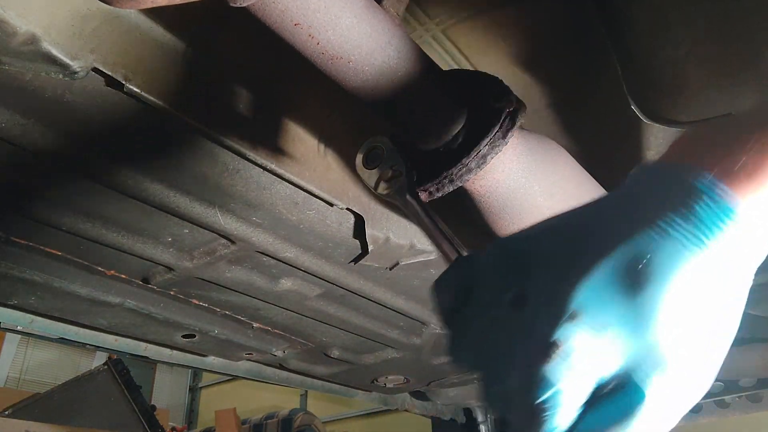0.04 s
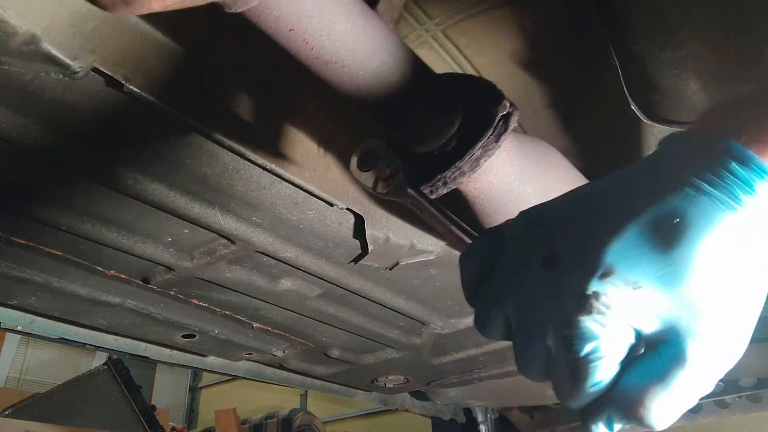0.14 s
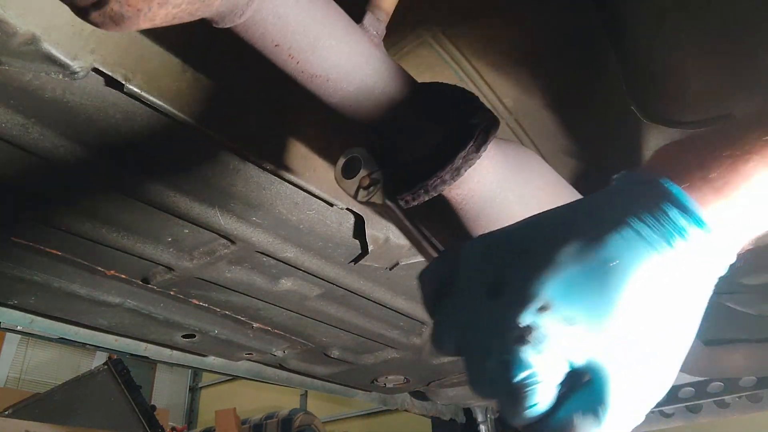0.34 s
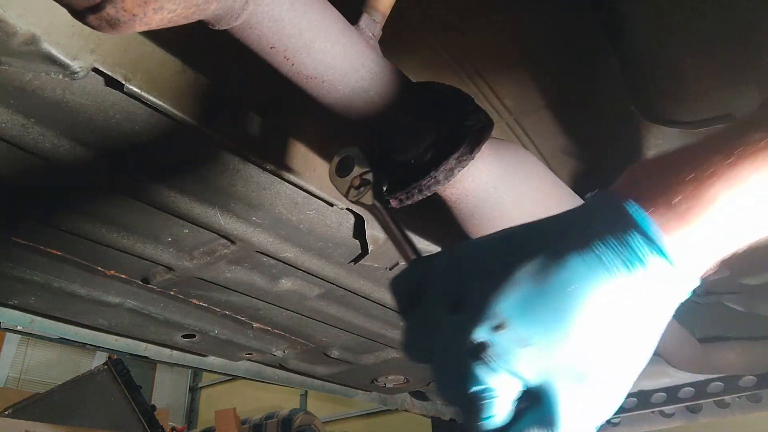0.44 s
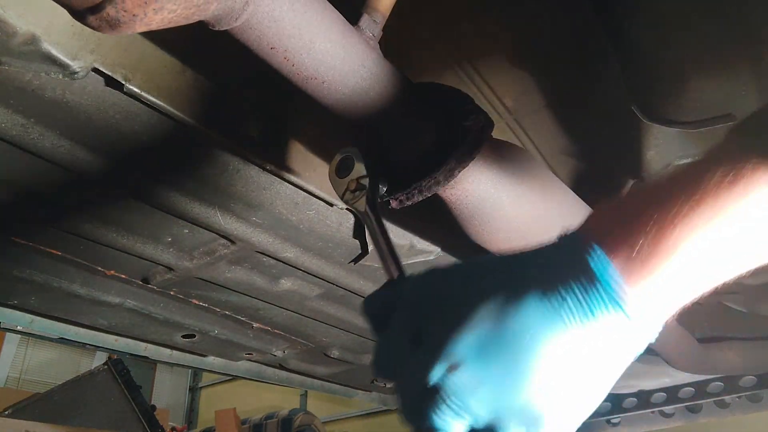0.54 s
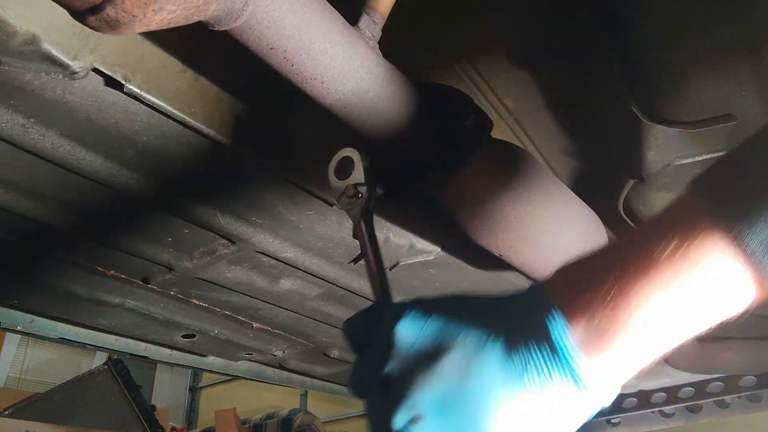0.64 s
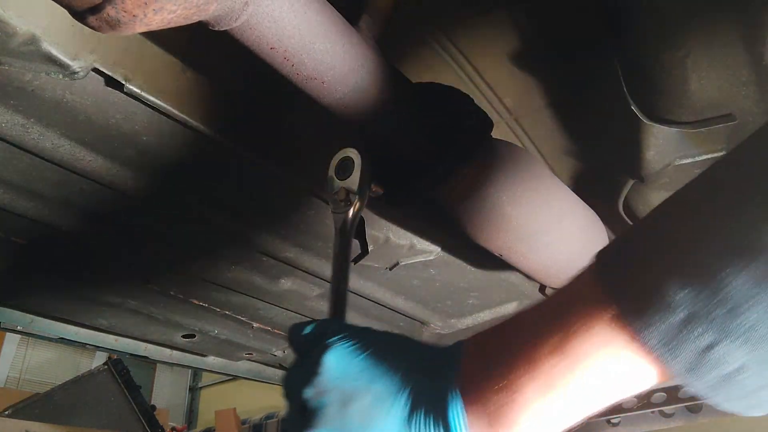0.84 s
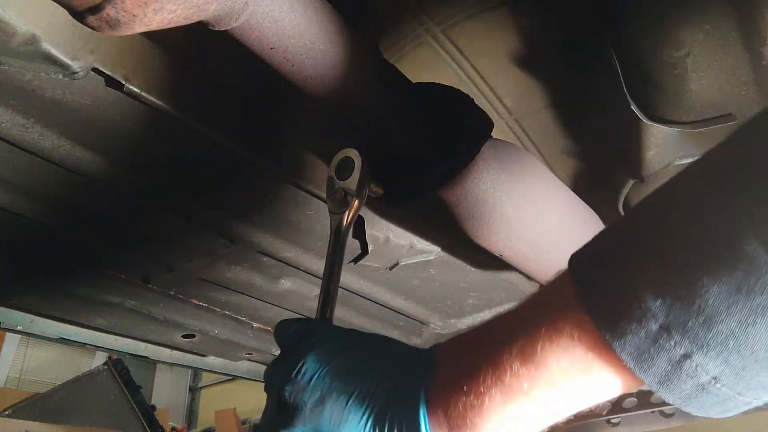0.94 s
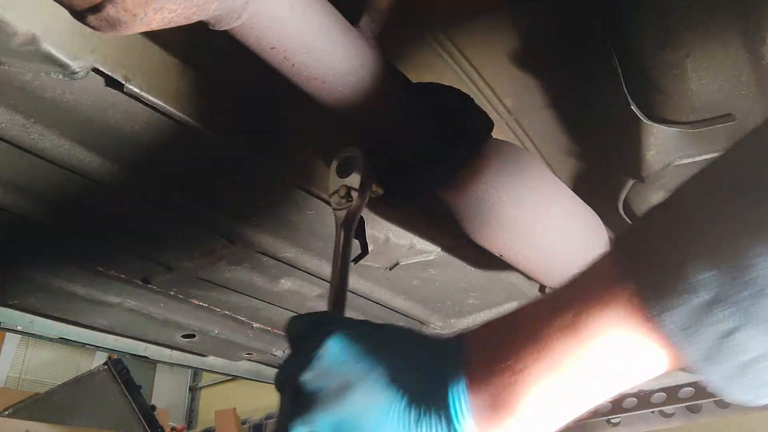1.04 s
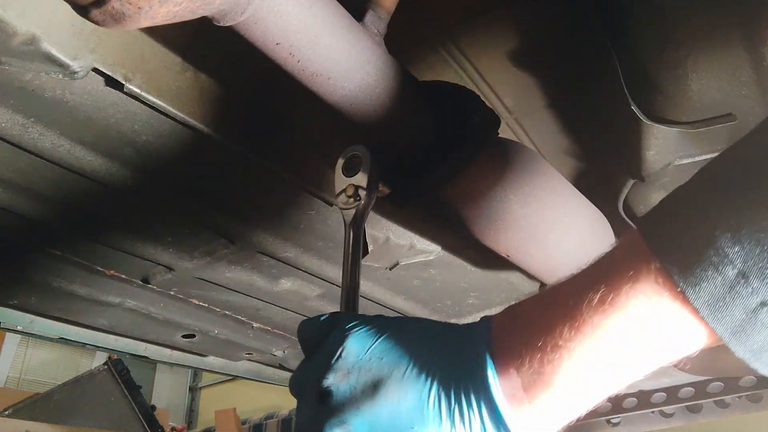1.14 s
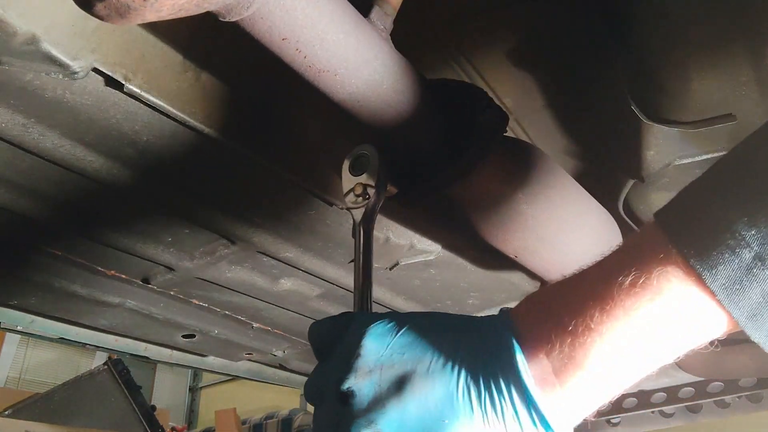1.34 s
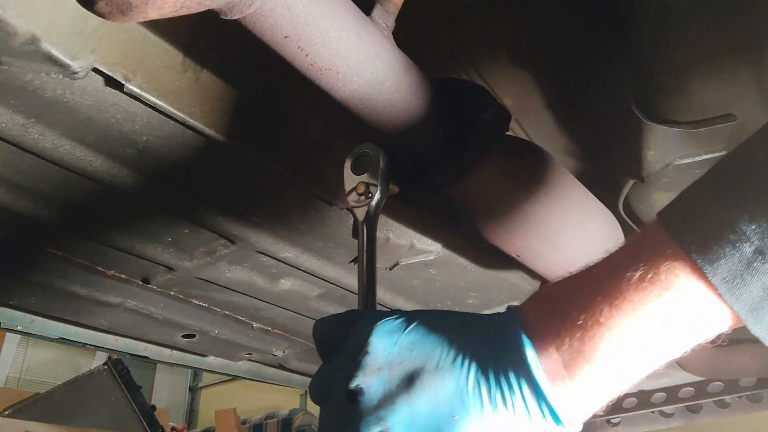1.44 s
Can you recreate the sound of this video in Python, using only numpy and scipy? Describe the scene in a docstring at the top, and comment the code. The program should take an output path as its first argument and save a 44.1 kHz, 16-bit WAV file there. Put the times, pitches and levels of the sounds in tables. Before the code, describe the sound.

Ratchet wrench clicking fast, eight bright metallic clicks after a rusty bolt rasps under strain

```python
"""A rusty exhaust bolt rasps under a car as a gloved hand strains a ratchet, and dull bumps hit the camera.
Then the handle swings back and the pawl clicks over eight teeth, ringing the tool and the pipe.
Rasps are dense random slips, clicks are short noise bursts with ringing steel, bumps are short low waves.
A low garage hum and hiss lie under all; two spaced microphones hear the work from the left."""
import sys
import numpy as np
from scipy import signal
from scipy.fft import rfft, irfft
from scipy.io import wavfile
from scipy.ndimage import uniform_filter1d

SR = 44100
rng = np.random.default_rng(int(sys.argv[2]) if len(sys.argv) > 2 else 0)


def how_loud(loudness_db):
    """Turn decibels into a plain amplitude multiplier (0 dB gives 1, 20 dB gives 10)."""
    steps = np.asarray(loudness_db, float) / 20
    return 10 ** steps


def unload_audio(sound):
    """Save the sound as a 16-bit wav file, at the path given as the first command line argument."""
    columns = np.transpose(np.atleast_2d(sound))
    # keep every value between -1 and 1, then stretch to whole-number steps
    steps = np.round(np.clip(columns, -1, 1) * 32767)
    wavfile.write(sys.argv[1], SR, steps.astype(np.int16))


N = 66150  # length in samples
RISE_S = 0.003  # time a click takes to build up, in seconds

# Notes of the ringing pipe (low) and tool (high).
# Each row: pitch in Hz, relative level in dB, time to fade by 60 dB in seconds.
STEEL = [(404, -40, .1), (692, -33, .12), (790, -30, .13), (900, -31, .2), (1600, -38, .1),
         (1760, -38, .12), (1873, -40, .12), (2335, -38, .15), (2600, -36, .07), (2978, -40, .28),
         (3155, -37, .1), (3405, -31, .1), (3452, -30, .1), (3545, -33, .08), (4068, -34, .08),
         (4858, -35, .3), (5600, -35, .08), (5188, -35, .12), (7890, -34, .05), (8130, -33, .06),
         (8258, -32, .08), (8400, -34, .06)]
# How much later the right microphone hears the work. Each row: frequency in Hz, delay in seconds.
LAG = [(400, 0.00037), (800, 0.00032), (1300, 0.00045), (10000, 0.000456)]
# How alike the two microphones hear the work. Each row: frequency in Hz, shared part from 0 to 1.
DIRECT = [(300, 0.95), (1000, 0.73), (3000, 0.24), (10000, 0.2)]


def evened(x):
    """Scales a signal to an average (rms) level of one."""
    return x / np.sqrt(np.mean(x ** 2) + 1e-20)


def read(points, hz):
    """Reads a curve between its points, along a logarithmic frequency scale."""
    f, value = np.transpose(points)
    return np.interp(np.log(hz + 1), np.log(f + 1), value)


def add(mix, s, sound):
    """Adds a sound to the mix from s seconds on, cut off at the end of the mix."""
    part = mix[:, max(round(s * SR), 0):][:, :sound.shape[1]]
    part += sound[:, :part.shape[1]]


def pair(a, b, same, lag=((1, 0), (2, 0)), db=((1, 0), (2, 0)), lean=((1, 0), (2, 0))):
    """Two channels from a shared and an unshared signal, coloured, the right one delayed."""
    hz = np.fft.rfftfreq(len(a), 1 / SR)
    share = np.clip(read(same, hz), 0, 1)
    left = rfft(a)
    delayed = left * np.exp(-2j * np.pi * hz * read(lag, hz))
    right = share * delayed + np.sqrt(1 - share ** 2) * rfft(b)
    # Half of the left-right difference goes to each side.
    gain_db = read(db, hz) + np.array([[.5], [-.5]]) * read(lean, hz)
    return irfft(np.array([left, right]) * how_loud(gain_db), len(a))


def shaped(x, db_of):
    """Multiplies the short-time spectrum by a gain over frequency and time."""
    hz, t, z = signal.stft(x, SR, nperseg=128)
    z = z * how_loud(db_of(hz[:, None] + 1, t))
    return signal.istft(z, SR, nperseg=128)[1][..., :x.shape[-1]]


def garage():
    """Low rumble, nearly alike on both sides, on a slow level curve, over a steady hiss."""
    # Rumble of garage and handling. Each row: time in seconds, level in dB.
    hum_level = [(0.0, -47), (0.146, -51.5), (0.246, -37.5), (0.274, -50), (0.3, -32.5), (0.324, -39),
                 (0.362, -43.5), (0.484, -45), (0.526, -44), (0.618, -47.5), (0.784, -50.5), (0.83, -55),
                 (0.864, -51), (0.98, -46), (1.032, -57.5), (1.098, -47.5), (1.214, -45.5), (1.244, -52.5),
                 (1.336, -49), (1.454, -51.5), (1.474, -66), (1.5, -46)]
    # Colour of the rumble. Each row: frequency in Hz, relative level in dB per Hz.
    hum_colour = [(8.8, -62), (15, 11.5), (49, -16), (95, 0), (144, -16), (176, -9.5), (223, -22.5),
                  (317, -19.5), (395, -23.5), (500, -18.5), (650, -23.5), (1100, -120)]
    # Colour of the hiss. Each row: frequency in Hz, relative level in dB per Hz.
    hiss_colour = [(120, -64), (200, 7), (506, -13), (946, -10.5), (2480, -17), (2720, -13), (6180, -19.5),
                   (12200, -21.5), (14300, -28)]
    # How alike the hiss is on both sides. Each row: frequency in Hz, likeness from 0 to 1.
    hiss_same = [(60, 0.97), (240, 0.58), (950, 0), (3770, 0), (15000, -0.0)]
    hiss_db = -62
    a, b, c, d = rng.standard_normal((4, N))
    # The added point holds the rumble at -84 dB above 700 Hz.
    hum = evened(pair(a, b, [(20, 0.98), (500, .95)], db=hum_colour + [(700, -84)]))
    s, db = np.transpose(hum_level)
    hum = hum * how_loud(np.interp(np.arange(N) / SR, s, db))
    hiss = how_loud(hiss_db) * evened(pair(c, d, hiss_same, db=hiss_colour))
    return hum + hiss


def room(x):
    """Echoes blur into a tail of decaying noise, different for each microphone."""
    room_db, fade_s = -8.5, 0.22  # level, and time for the tail to fall by 60 dB
    dullness = 0.33  # treble loss of the tail, 0 to 1
    t = np.arange(SR // 2) / SR
    # The tail starts 6 ms after the direct sound.
    tail = rng.standard_normal((2, len(t))) * how_loud(-60 * t / fade_s) * (t > .006)
    tail = signal.lfilter([1], [1, -np.clip(dullness, 0, .9)], tail)
    tail = tail / np.linalg.norm(tail[0])
    return how_loud(room_db) * signal.fftconvolve(x, tail, axes=1)[:, :N]


def bump(s, db, hz, cycles):
    """A knock carried into the camera body: a short dull wave, alike in both microphones."""
    t = np.arange(-2000, 2000) / SR
    swell = np.exp(-(2 * t * hz / cycles) ** 2)
    # Either sign, with a slightly random phase.
    turn = .5 * rng.integers(2) + 0.17 * rng.standard_normal()
    wave = swell * np.cos(2 * np.pi * (hz * t + turn))
    return s - 2000 / SR, how_loud(db) * wave * np.ones((2, 1))


def rasp():
    """Bolt and pipe rub under load: dense uneven slips of rust, heard directly and through the pipe."""
    # Two spells of rubbing. Each row: time in seconds, level in dB, brightness in dB per octave.
    strain = [
        [(0.0, -49.5, -0.5), (0.034, -56, -3.5), (0.074, -73.5, 4), (0.164, -55, 2.5), (0.19, -43, 0.0),
         (0.242, -37, -1.5), (0.408, -55.5, 2), (0.432, -47, 2.5), (0.456, -57.5, 4.5), (0.468, -41, 0.0),
         (0.494, -56.5, 4), (0.582, -53.5, 3), (0.66, -47.5, 1.5)],
        [(1.04, -65.5, -8), (1.08, -53.5, 2.5), (1.146, -38.5, 0.0), (1.182, -49.5, 1), (1.286, -57.5, -0.5),
         (1.29, -60.5, -11)],
    ]
    # Colour of the direct rubbing. Each row: frequency in Hz, relative level in dB per Hz.
    colour = [(88, -58), (150, -32), (224, -34), (397, -5.5), (690, -7.5), (744, -13), (901, -2),
              (1970, -12), (2830, -11.5), (14300, -28.5)]
    # Which part of the pipe the rubbing excites most. Each row: time in seconds, pitch in Hz.
    rub_at = [(.17, 420), (.27, 480), (.47, 780), (1.1, 800), (1.15, 900)]
    slips_per_s, slip_spread_db = 2500, 2
    ring_db = -2  # ringing against direct rubbing
    rub_fall_db = -14  # per octave away from the most excited pitch

    strength = how_loud(slip_spread_db * rng.exponential(1, (2, N)).clip(0, 5))
    slips = strength * (rng.random((2, N)) < slips_per_s / SR)
    slips = slips * rng.choice([-1., 1.], (2, N)) + 0.12 * rng.standard_normal((2, N))

    t = np.arange(8192) / SR
    heard = pair(*slips, DIRECT, LAG)
    most_excited = np.interp(np.arange(N) / SR, *np.transpose(rub_at))
    rung = np.zeros((2, N))
    for f, _, t60 in STEEL[:8]:  # the low notes, fading within 0.1 s at most
        push = heard * how_loud(rub_fall_db * abs(np.log2(f / most_excited)))
        note = how_loud(-60 * t / min(t60, .1)) * np.sin(2 * np.pi * f * t)
        rung += signal.oaconvolve(push, note[None], axes=1)[:, :N]

    direct = evened(pair(*slips, DIRECT, LAG, colour))
    x = evened(direct + how_loud(ring_db) * evened(rung))
    # The last point sets the faint level held to the end.
    s, db, tilt = np.concatenate(strain + [[(1.36, -71, 0.034)]]).T
    return shaped(x, lambda f, u: np.interp(u, s, db) + np.interp(u, s, tilt) * np.log2(f / 1000 + 0.12))


def focus(f, hz0, focus_db):
    """Gain in dB that favours frequencies near hz0, as each contact has its own brightest pitch."""
    width_octaves = 0.17
    return focus_db * np.exp(-(np.log2(f / hz0) / width_octaves) ** 2) - .5 * focus_db


def crack(t, hz0, bounce, focus_db, damp):
    """Metal snaps and bounces: chattering noise whose frequency bands die at their own speeds."""
    # Colour of a click. Each row: frequency in Hz, relative level in dB per Hz.
    colour = [(290, -48), (500, -27.5), (740, -27), (796, -18), (1360, -17), (1530, -17.5), (2020, -18.5),
              (3450, -2), (3770, -5.5), (6740, -8), (8140, -7), (13900, -10), (16100, -36)]
    # How fast each band fades before damp speeds it up. Each row: frequency in Hz, 60 dB fade in seconds.
    fade = [(500, 0.25), (1500, 0.45), (3000, 0.22), (6000, 0.22), (12000, 0.17)]
    # How the sides differ. Each row: frequency in Hz, left minus right in dB.
    lean = [(500, -23), (1000, -1.5), (2500, -6), (5000, 1.5), (9000, -2), (13000, 0)]
    snap_s, bounce_s = 0.0049, 0.0098  # decay of a snap, usual delay of the bounce
    snap_db = 3.5  # snap above the slower part
    chatter_db, patch_db = 2.4, 3.5  # uneven loudness, uneven colour

    def hit(u):
        return np.clip(u / RISE_S, 0, 1) ** 0.84 * np.exp(-np.maximum(u - RISE_S, 0) / snap_s)

    noise = evened(pair(*rng.standard_normal((2, len(t))), DIRECT, LAG, colour, lean))
    # Random patches over 65 frequencies and 257 moments.
    patch = uniform_filter1d(rng.standard_normal((65, 257)), size=2, axis=0)
    patch = evened(uniform_filter1d(patch, size=10, axis=1))
    noise = shaped(noise, lambda f, u: (focus(f, hz0, focus_db) - 60 * damp * u / read(fade, f)
                                        + patch_db * patch))
    chatter = evened(uniform_filter1d(rng.standard_normal(len(t)), size=60))
    snaps = hit(t) + bounce * hit(t - bounce_s * rng.uniform(.85, 1.15))
    envelope = np.clip(t / RISE_S, 0, 1) / how_loud(snap_db) + snaps
    return noise * envelope * how_loud(chatter_db * chatter)


def steel_ring(t, hz0, tool_db, focus_db, pipe_db):
    """Struck steel rings as many fading sine waves, the low ones from the pipe, the high from the tool."""
    tool_from_hz, spread_db, wobble_db = 2500, 2, 2
    f, level_db, t60 = np.transpose(STEEL)[:, :, None]
    # Starting phases in turns: the right side is late and a little random.
    turn = rng.random((2, len(f), 1))
    turn[1] = turn[0] - f * read(LAG, f) + 0.9 * (turn[1] - .5)
    jitter = rng.standard_normal((len(f), 1))
    wobble = np.repeat(rng.standard_normal((len(f), 64)), 256, axis=1)
    wobble = evened(uniform_filter1d(wobble, size=512, axis=1))
    db = level_db + np.where(f > tool_from_hz, tool_db, pipe_db) + focus(f, hz0, focus_db)
    db = db + spread_db * jitter + wobble_db * wobble - 60 * t / t60
    notes = how_loud(db) * np.sin(2 * np.pi * (f * t + turn))
    return notes.sum(1) * np.clip(t / RISE_S, 0, 1)


def click(s, db, hz0, pan_db, bounce, tool_db, focus_db, pipe_db, damp=1):
    """One contact of metal on metal: a crack of noise plus the ringing steel, starting just before s."""
    t = np.arange(16384) / SR
    sound = 0.33 * crack(t, hz0, bounce, focus_db, damp) + 3 * steel_ring(t, hz0, tool_db, focus_db, pipe_db)
    return s - .3 * RISE_S, how_loud(db + np.array([[.5], [-.5]]) * pan_db) * sound


def scene():
    """Places every contact and bump in time, then adds room, rasp and garage."""
    # Pawl dropping on a tooth. Each row: time in seconds, level in dB, brightest pitch in Hz,
    # left minus right in dB, bounce share from 0 to 1, ring of the tool in dB.
    teeth = [(0.6669, -19, 6400, 2, 0.14, -31), (0.715, -19, 9300, 3, 0.16, -1),
             (0.7511, -16.5, 4560, 1.5, 0.4, 1), (.8061, -18.5, 6400, 1.5, 0.8, -3),
             (0.849, -17, 4170, -3.5, 0, 9.5), (0.8913, -17, 3580, -1, 0.7, 6.5),
             (.9323, -19, 8400, -4, 0.6, 13.5), (.9782, -18, 4700, -4, 0.1, 2)]
    # Small ticks of tool on bolt. Each row: time in seconds, level in dB, brightest pitch in Hz,
    # left minus right in dB, how far the brightest pitch stands out in dB.
    ticks = [(0.031, -49, 4600, -3, 5), (0.235, -32.5, 2920, -2, 12.5), (0.332, -38, 6850, 3.5, 3.5),
             (.403, -35.5, 8100, 3, -2.5), (.465, -40, 820, -7, 19), (1.02, -29.5, 4800, 8, 19.5),
             (1.110, -27, 2700, 0, 23), (1.140, -45, 3200, -6, 22), (1.109, -59, 1760, -9, 13),
             (1.3737, -39, 3150, -1, 8), (1.377, -31.5, 1796, 5, 36)]
    # Bumps on the camera. Each row: middle in seconds, level in dB, pitch in Hz, length in cycles.
    bumps = [(0.304, -27, 217, 1.2), (.315, -31.5, 30.2, 1.5), (0.423, -45, 29.8, 0.56),
             (0.325, -58, 153, .7), (0.333, -29.5, 105, 0.55), (0.369, -35, 92, 0.58),
             (.422, -29, 210, 0.61), (0.434, -32.5, 348, 3.03), (.44, -30, 100, 0.32),
             (0.452, -38.5, 278, 1.9), (1.111, -41.5, 78, 2.7), (1.19, -44.5, 112, 1.9)]
    tool, camera = np.zeros((2, 2, N))
    for row in teeth:
        add(tool, *click(*row, focus_db=4.5, pipe_db=-1))
    for s, db, hz, pan_db, focus_db in ticks:
        # Ticks ring less than pawl clicks, and their noise dies 1.88 times as fast.
        add(tool, *click(s, db, hz, pan_db, bounce=.4, tool_db=-14, focus_db=focus_db, pipe_db=-15, damp=1.88))
    for row in bumps:
        add(camera, *bump(*row))
    return tool + room(tool) + rasp() + camera + garage()


def band_limit(x):
    """A steep low-pass at the top of the band."""
    return signal.sosfilt(signal.butter(12, 16270, fs=SR, output="sos"), x)


def record(dry):
    """The microphones lose the highest treble."""
    # Top end of the microphones. Each row: frequency in Hz, gain in dB.
    mic = [(20, 0), (14300, 0), (14800, -28), (16000, -34), (22050, -70)]
    gain = how_loud(read(mic, np.fft.rfftfreq(N, 1 / SR)))
    heard = irfft(rfft(dry) * gain, N)
    return band_limit(heard)


dry = scene()
out = record(dry)
unload_audio(out)
```